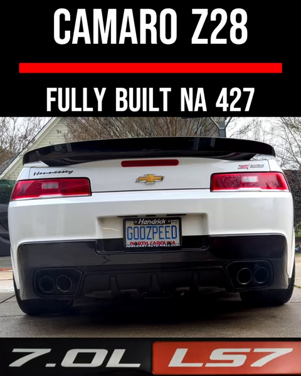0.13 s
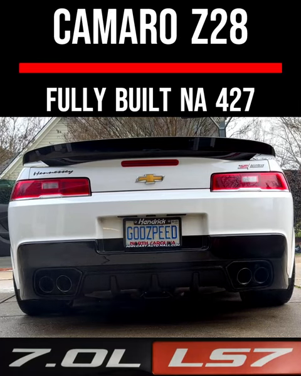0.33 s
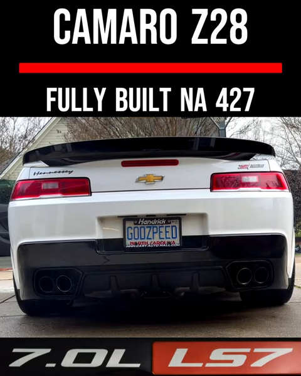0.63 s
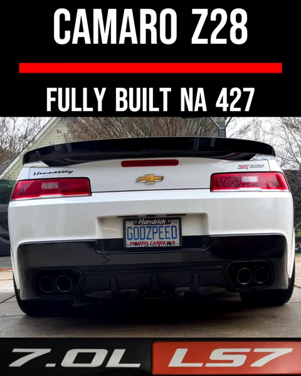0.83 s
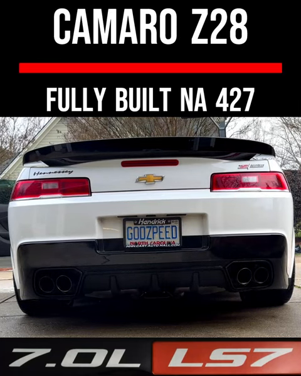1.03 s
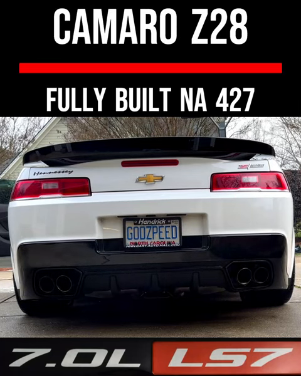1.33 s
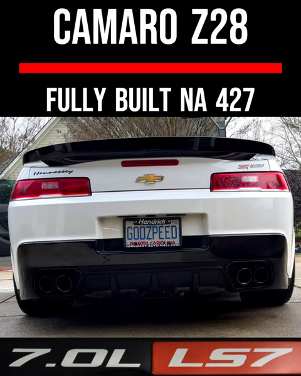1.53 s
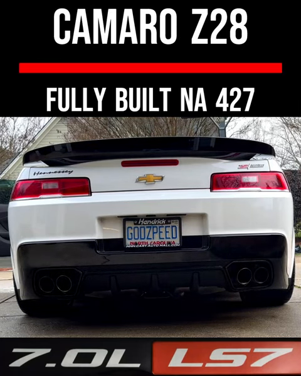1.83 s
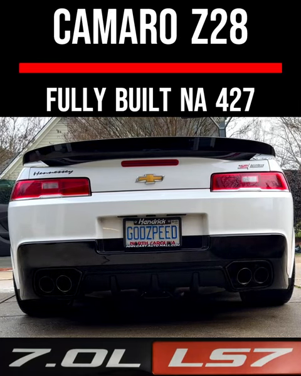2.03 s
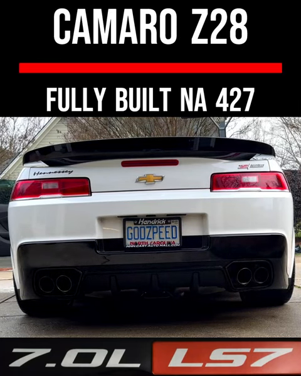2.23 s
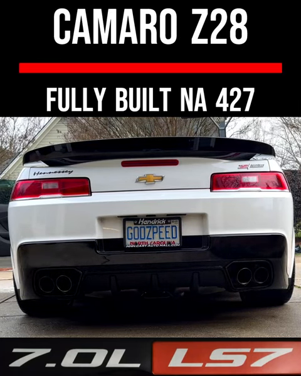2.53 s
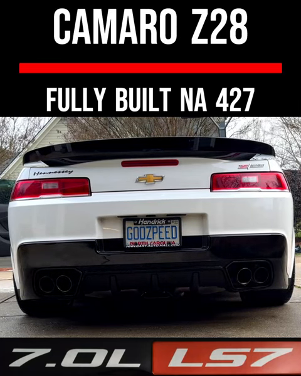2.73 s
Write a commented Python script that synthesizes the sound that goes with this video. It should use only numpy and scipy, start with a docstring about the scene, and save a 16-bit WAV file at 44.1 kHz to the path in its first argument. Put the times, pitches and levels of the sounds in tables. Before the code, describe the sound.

Powerful car exhaust heard from behind, barking and popping before dropping to an uneven, burbling idle

```python
"""Driveway, behind the car: a big cross-plane V8 settles from its fast starting idle into a loping one.
Each firing pops and barks through the exhaust and rasps as hiss at the tailpipes; the hardest ones crack.
As the speed falls the firings grow uneven, the pipes boom and a fine metallic ticking stands out.
Pulse trains on one engine speed drive falling tones, filter resonances and noise bursts; echoes follow."""
import sys
import numpy as np
from scipy import signal
from scipy.fft import rfft, irfft, next_fast_len
from scipy.io import wavfile
from scipy.ndimage import uniform_filter1d

SR = 44100
rng = np.random.default_rng(int(sys.argv[2]) if len(sys.argv) > 2 else 0)


def inscribe(sig):
    """Save sig as 16-bit PCM at rate SR to the path in sys.argv[1].

    A 1-D sig is mono; a 2-D sig holds one channel per row.
    Samples are clipped to [-1, 1] before scaling.
    """
    pcm = np.round(np.clip(np.atleast_2d(sig).T, -1, 1) * 32767)
    wavfile.write(sys.argv[1], SR, pcm.astype(np.int16))


N = 127008
T = np.arange(N) / SR

# engine speed: time_s, firings_per_s
ENGINE_SPEED = [(0.0, 116.65), (0.32, 116.02), (0.5, 118.2), (0.62, 117.0), (1.12, 103.85), (1.5, 100.94),
                (2.0, 99.28), (2.16, 93.46), (2.5, 93.18), (2.88, 93.54)]
# eight cylinders in firing order: pop_db, rasp_db, lateness_firing_intervals
CYLINDERS = [(-8, -2, .11), (0, 1, -.02), (-3, -1, .01), (-8, -3, .07), (-7, -1, .04), (1, 1, -.02),
             (1, 1, .02), (-8, -2, .07)]
# layer levels following engine load: time_s, firing_tone_db, pop_db, muffler_bark_db, rasp_db
LOAD = [(0, -18, -15, -24, -41.5), (.28, -18.5, -17, -26, -42), (.45, -20.5, -14, -27, -43.5),
        (.6, -22, -21.5, -25, -43.5), (.85, -19.5, -22, -25, -43.5), (.98, -22, -33.5, -27.5, -46),
        (1.45, -23.5, -28, -28.5, -46.5), (1.7, -27.5, -33, -30.5, -47), (2.0, -27.5, -35.5, -31.5, -45),
        (2.2, -28, -27.5, -33.5, -48), (2.6, -30.5, -33.5, -28.5, -45), (2.88, -24.5, -28, -34, -45.5)]
# unevenness of combustion: time_s, lope_share_0_to_1, pipe_boom_db
LOPE = [(0, 0.28, -35), (.2, 0.22, -28.5), (.5, 0.17, -30.5), (.6, 0.19, -22), (.85, 0.34, -27),
        (.93, 0.92, -27.5), (1.05, 0.73, -25.5), (1.35, 0.76, -30.5), (1.72, 0.84, -31.5),
        (1.95, 0.69, -28.5), (2.3, 1, -28.5), (2.6, 1, -30), (2.88, 0.54, -21)]
# hardest firings: pop_peak_s, pop_db
HARD_FIRINGS = [(.049, -13.5), (.059, -12.5), (.325, -13), (.334, -12), (.462, -13), (.529, -13.5),
                (.538, -16), (.555, -17.5), (.632, -14.5), (.701, -19.5), (.71, -16.5), (.852, -17),
                (.878, -19), (.924, -25), (.999, -27), (1.144, -29.5), (1.259, -26), (1.305, -23.5),
                (1.365, -24.5), (1.414, -23), (1.457, -22), (1.573, -23), (1.725, -27.5), (2.483, -24.5),
                (2.687, -26.5)]
# harmonics of the firing rate: multiple, level_db
TONE_HARMONICS = [(1, 0), (2, -3.5), (3, -17)]
# low pipe resonances: freq_hz, gain_db
BOOM_RESPONSE = [(20, -51), (33, -25), (45, -10), (58, 10), (78, -4), (100, 0), (135, -3.5), (175, 7),
                 (215, -0.5), (280, -10), (500, -56)]
# muffler resonances: freq_hz, gain_db
BARK_RESPONSE = [(60, -81.5), (120, -8), (170, 5.5), (215, -8), (280, 0), (320, 5), (385, -13), (445, 9.5),
                 (510, -3.5), (570, -16.5), (635, -11), (760, -15), (900, -52), (1300, -56), (3000, -57.5)]
# tailpipe hiss: freq_hz, gain_db
RASP_RESPONSE = [(400, -0.5), (1000, -5), (1550, 5.5), (1800, -12.5), (2050, -2), (2300, 10), (2480, -0.5),
                 (2750, 8.5), (3150, 6), (3600, -8), (4200, -12), (5400, -2.5), (7000, -14.5),
                 (10000, -12.5), (16000, -21)]
# metallic tick resonances: freq_hz, gain_db
TICK_RESPONSE = [(2000, -2.5), (4300, -38), (5000, 8), (5700, 7), (6700, -8), (7700, -1.5), (9000, 7),
                 (11000, 8.5), (13300, -3), (16000, -5)]
# low ring of a crack: freq_hz, gain_db
LOW_SNAP_RESPONSE = [(300, 8), (1000, -8), (1900, 5.5), (2400, 11), (3100, 13), (4200, 0.5), (7000, -4),
                     (15000, -27)]
# high ring of a crack: freq_hz, gain_db
HIGH_SNAP_RESPONSE = [(1000, -24), (3000, 20), (4200, -7), (5400, 13), (7000, -13), (9000, 8), (15000, -31)]
# engine-bay rush: freq_hz, gain_db
RUSH_RESPONSE = [(800, 0.5), (1550, 0), (2600, -6.5), (15000, -26)]
# stereo balance of the treble: freq_hz, left_over_right_db
TREBLE_BALANCE = [(1000, 2), (2300, -0.5), (3300, 6), (5500, 6.5), (7000, 10), (9000, -4.5), (15000, -4)]
# booming pipe swells: peak_s, pitch_hz, level_db
CHUGS = [(0.831, 178, -32), (1.228, 180, -31), (1.419, 181, -29), (1.581, 172, -30), (1.895, 170, -17.5),
         (2.049, 160, -20.5), (2.494, 188, -31), (2.802, 172, -33), (2.848, 169, -32)]
# tailpipe cracks: start_s, low_snap_db, high_snap_db
CRACKS = [(.0468, -36, -24.5), (.0558, -17, -16), (.1155, -21, -33), (.1245, -26, -33), (2.618, -30, -33),
          (.3225, -28, -18.5), (.3312, -20, -38), (.527, -39, -27), (.535, -21, -29), (.6288, -25, -29),
          (.8395, -28.5, -33), (.849, -22, -31.5), (.996, -34.5, -36), (1.304, -32, -37), (2.276, -30, -35)]
# base level of the faint ticking: time_s, level_db
TICKING_LEVEL = [(0, -51), (.9, -51), (1.5, -48), (2.05, -47.5), (2.15, -44.5), (2.25, -49), (2.88, -48)]
# clearest ticks: start_s, level_db
CLEAR_TICKS = [(0.959, -40), (1.266, -40), (1.603, -36), (1.821, -43), (2.085, -36), (2.254, -44.5),
               (2.427, -49), (2.685, -46), (2.738, -42)]
# brief dips of rasp and faint ticking: centre_s, gain_db
LULLS = [(1.592, -6), (1.75, -9.5), (1.911, -9), (2.067, -10), (2.84, -2)]
# echoes from paving, bumper and house: delay_s, louder_side_db, left_over_right_db
ECHOES = [(.0021, -50, -28), (.0047, -16.5, 52), (0.0122, -23, 16), (0.0174, -8, 13), (0.0305, -9, -34)]

FIRST_FIRING_INTERVALS = 0.5417
# at full lope: pop scatter, timing jitter, share of the cylinder pop pattern lost
SCATTER_DB, JITTER_S, PATTERN_FADE_SHARE = 2.5, 0.001, 0.92
RASP_SCATTER_DB = 3.0
# tone: lag; overtone loss and surge at full lope
TONE_LAG_INTERVALS, TONE_FADE_DB, SURGE_DB = 0.33, 7.5, 6.5
# pop: pitch at its peak, cycles to the peak, share the pitch finally sags, log pitch spread at full lope
POP_HZ, POP_CYCLES, POP_SAG_SHARE, POP_SPREAD = 432.5, 1.01, 0.27, 0.23
CHUG_CYCLES = 3
# bark: delay behind the pulse, turbulence decay, turbulence level at no lope, detuning share
BARK_LAG_S, PUFF_S, SMOOTH_CHURN, RING_SPREAD_SHARE = 0.00062, 0.0099, 0.05, 0.093
RASP_S, RASP_FLOOR, RASP_ALIKE_SHARE = 0.0045, 0.35, 0.23
CRACK_S, CRACK_TAIL_DB, CRACK_TAIL_S = 0.00063, -17.5, 0.01
TICK_S, TICK_FLOOR, TICK_ALIKE_SHARE, TICK_LEFT_DB = 0.0028, 0.2, 0.89, 4.5
TICK_LAG_INTERVALS, TICK_JITTER_S, TICK_SCATTER_DB, TICK_SPREAD_SHARE = 0.37, 0.0025, 5.0, 0.071
FLUTTER_DB, FLUTTER_PER_S, LULL_S = 5.5, 16, 0.018
RUSH_OVER_RASP_DB = -6
EXHAUST_LEFT_DB, LEFT_LAG_S = 0.7, 0.000023
ECHO_LOW_HZ, CEILING, CUTOFF_HZ = 386, 0.54, 15700


def from_db(db):
    """Decibels to gain."""
    return 10 ** (np.asarray(db) / 20)


def lean(left_db):
    """Left and right gains, left_db apart."""
    return from_db(left_db * np.array([[.5], [-.5]]))


def rms_one(x):
    """Scale to unit power."""
    return x / np.sqrt(np.mean(x ** 2) + 1e-20)


def in_time(rows):
    """Each column of a curve at every sample."""
    s, *columns = np.transpose(rows)
    return [np.interp(T, s, c) for c in columns]


def colour(x, points, balance=0):
    """Causal minimum-phase filter through (Hz, dB) points; balance leans the treble left or right."""
    size = 2 * next_fast_len(N)
    log_hz = np.log(np.maximum(np.arange(size // 2 + 1) * SR / size, 1))
    db = 0
    for weight, curve in ((1, points), (balance, TREBLE_BALANCE)):
        hz, gain_db = np.transpose(curve)
        db = db + weight * np.interp(log_hz, np.log(hz), gain_db)
    # fold the cepstrum onto positive time: minimum phase
    cepstrum = irfft(db * np.log(10) / 20)
    cepstrum[1:size // 2] *= 2
    cepstrum[size // 2 + 1:] = 0
    return irfft(rfft(x, size) * np.exp(rfft(cepstrum)))[:N]


def detuned(points, share, above_hz):
    """Shift the response points above a frequency by a share."""
    return [(hz * (1 + share * (hz > above_hz)), db) for hz, db in points]


def clicks(s, strength):
    """One impulse at each time."""
    return np.bincount(np.clip(s * SR, 0, N).astype(int), strength, N + 1)[:N]


def die_away(x, decay_s):
    """Give each impulse an exponential tail."""
    return signal.lfilter([1], [1, -np.exp(-1 / (decay_s * SR))], x + 1e-18)


def even(x):
    """Take out slow changes of level."""
    return x / np.sqrt(uniform_filter1d(x ** 2, size=7000) + 1e-12)


def hiss(envelope, points, alike):
    """Stereo noise under an envelope, ringing in a response; alike is the power share common to both sides."""
    shared, *own = rng.standard_normal((3, N))
    alike = np.clip(alike, 0, 1)
    noise = np.sqrt(alike) * shared + np.sqrt(1 - alike) * np.array(own)
    out = np.array([colour(n * envelope, points, side) for n, side in zip(noise, (.5, -.5))])
    return rms_one(out) * np.sqrt(np.mean(envelope ** 2))


def burst(s, hz, cycles, sag=0):
    """A tone that swells for some cycles, peaks at s and dies away, sagging in pitch."""
    out, rise_s = np.zeros(N), cycles / hz
    span = slice(*np.searchsorted(T, [s - rise_s, s + 5 * rise_s]))
    age = (T[span] - s) / rise_s
    swell = ((1 + age) * np.exp(-age)) ** 3
    turns = cycles * (age - sag * age ** 2 / (2 + abs(age)))
    out[span] = -swell * np.cos(2 * np.pi * turns)
    return out


def flutter():
    """A random treble gain with FLUTTER_PER_S new values a second, joined by straight lines in dB."""
    swing = 2 * rng.random(size=200) - 1
    return from_db(FLUTTER_DB * np.interp(T * FLUTTER_PER_S, np.arange(200), swing))


def lulls():
    """Gain with brief bell-shaped dips."""
    return from_db(sum(db * np.exp(-((T - at) / LULL_S) ** 2) for at, db in LULLS))


def firings(turn, lope, pop_db):
    """Time, pop dB and rasp strength of each firing: a cylinder pattern upset by lope and hard firings."""
    k = np.arange(int(turn[-1]))
    cylinder_db, rasp_db, late = np.array(CYLINDERS)[k % len(CYLINDERS)].T
    s = np.interp(k + FIRST_FIRING_INTERVALS + late, turn, T)
    uneven = np.interp(s, T, lope)
    strength, timing, grit = np.clip(rng.standard_normal((len(k), 3)), -1.5, 1.5).T
    db = np.interp(s, T, pop_db) + cylinder_db * (1 - PATTERN_FADE_SHARE * uneven)
    db += SCATTER_DB * uneven * strength
    for at, hard_db in HARD_FIRINGS:
        # the firing whose pop peaks nearest
        db[np.argmin(abs(s + POP_CYCLES / POP_HZ - at))] = hard_db
    rasp_db = rasp_db + RASP_SCATTER_DB * (uneven * strength + grit * .5)
    return s + JITTER_S * uneven * timing, db, from_db(rasp_db)


def rush(rasp_db):
    """Smooth noise from the engine bay, following the rasp level."""
    return hiss(from_db(rasp_db + RUSH_OVER_RASP_DB), RUSH_RESPONSE, alike=0.89)


def echoes(x):
    """A few early reflections, weak in the bass, leaning to either side."""
    bright = signal.sosfilt(signal.butter(2, ECHO_LOW_HZ, "high", fs=SR, output="sos"), x)
    out = 0
    for delay_s, db, left_db in ECHOES:
        delayed = np.interp(T - delay_s, T, bright, left=0)
        out = out + delayed * from_db(db - abs(left_db) / 2) * lean(left_db)
    return out


def ticking(turn, lull):
    """Faint metallic ticks in step with the firings plus clear ones, their top resonances at one of three pitches."""
    k = np.arange(int(turn[-1]))
    s = np.interp(k + FIRST_FIRING_INTERVALS + TICK_LAG_INTERVALS, turn, T)
    size, timing = rng.random((len(s), 2)).T
    s = s + TICK_JITTER_S * (2 * timing - 1)
    level = from_db(in_time(TICKING_LEVEL)[0]) * lull * flutter()
    excess_db = TICK_SCATTER_DB * np.minimum(-np.log(1 - size), 2.7)
    faint = np.interp(s, T, level) * from_db(excess_db)
    clear_s, clear_db = np.transpose(CLEAR_TICKS)
    s, strength = np.r_[s, clear_s], np.r_[faint, from_db(clear_db)]
    pitch = rng.integers(-1, 2, len(s))
    out = 0
    for step in (-1, 0, 1):
        tails = die_away(clicks(s, strength * (pitch == step)), TICK_S)
        points = detuned(TICK_RESPONSE, TICK_SPREAD_SHARE * step, above_hz=8000)
        out = out + hiss(tails + TICK_FLOOR * level, points, TICK_ALIKE_SHARE)
    return out * lean(TICK_LEFT_DB)


def cracks():
    """The steepest pulses snap, each with its own mix of low and high ring, and leave a short tail."""
    s, low_db, high_db = np.transpose(CRACKS)
    out = 0
    for db, points in ((low_db, LOW_SNAP_RESPONSE), (high_db, HIGH_SNAP_RESPONSE)):
        hits = clicks(s, from_db(db))
        tail = from_db(CRACK_TAIL_DB) * die_away(hits, CRACK_TAIL_S)
        out = out + hiss(die_away(hits, CRACK_S) + tail, points, alike=0.46)
    return out


def rasp(s, strength):
    """Every pulse leaves the tailpipes with a short burst of hiss over a steady floor."""
    puffs = die_away(clicks(s, strength), RASP_S)
    return hiss(rms_one(puffs + RASP_FLOOR), RASP_RESPONSE, RASP_ALIKE_SHARE)


def chugs():
    """Low swells, when a full charge sets a pipe booming."""
    return sum(from_db(db) * burst(s, hz, CHUG_CYCLES) for s, hz, db in CHUGS)


def boom(s):
    """Firings fuller or leaner than average set the low pipe resonances going."""
    return even(colour(clicks(s, rng.uniform(-0.75, 1, len(s))), BOOM_RESPONSE))


def bark(s, strength, lope):
    """Steep pulse fronts and the turbulence behind them ring through the mufflers, some sharp, some flat."""
    shift = np.clip(np.interp(s, T, lope) * 2 * (2 * rng.random(len(s)) - 1), -1, 1)
    fronts = clicks(s, strength)
    fronts_rms = np.sqrt(np.mean(fronts ** 2))
    churn = rms_one(die_away(fronts, PUFF_S) * rng.standard_normal(N))
    out = colour((lope + SMOOTH_CHURN) * churn, BARK_RESPONSE)
    for step in (-1, 0, 1):
        # crossfade each front between neighbouring tunings
        share = np.maximum(1 - abs(shift - step), 0)
        points = detuned(BARK_RESPONSE, RING_SPREAD_SHARE * step, above_hz=350)
        out += colour(clicks(s, strength * share) / fronts_rms, points)
    return even(out)


def firing_tone(turn, lope):
    """Pulsing of the gas flow; as firings turn uneven it surges and its overtones fade."""
    every_other = np.arange(0, turn[-1] + 2, 2)
    surge = np.interp(turn, every_other, 2 * rng.random(len(every_other)) - 1)
    phase = 2 * np.pi * (turn - FIRST_FIRING_INTERVALS - TONE_LAG_INTERVALS)
    wave = 0
    for multiple, db in TONE_HARMONICS:
        fade_db = TONE_FADE_DB * lope * (multiple > 1)
        wave = wave + from_db(db - fade_db) * np.cos(multiple * phase)
    return wave * from_db(SURGE_DB * lope * surge)


def pops(s, db, lope):
    """Each firing leaves the pipes as a short falling pop; uneven ones are pitched higher or lower."""
    hz = POP_HZ * np.exp(POP_SPREAD * np.interp(s, T, lope) * (2 * rng.random(len(s)) - 1))
    peak_s = s + POP_CYCLES / POP_HZ
    return sum(gain * burst(at, f, POP_CYCLES, POP_SAG_SHARE) for at, f, gain in zip(peak_s, hz, from_db(db)))


def scene():
    """Engine layers on one speed and lope; exhaust slightly left, echoes and treble around it."""
    turn = np.cumsum(in_time(ENGINE_SPEED)[0]) / SR  # firings elapsed
    tone_db, pop_db, bark_db, rasp_db = in_time(LOAD)
    lope, boom_db = in_time(LOPE)
    s, firing_db, rasp_strength = firings(turn, lope, pop_db)

    front_strength = from_db(firing_db - np.interp(s, T, pop_db))
    pipes = from_db(bark_db) * bark(s + BARK_LAG_S, front_strength, lope)
    pipes = pipes + from_db(tone_db) * firing_tone(turn, lope)
    pipes = pipes + pops(s, firing_db, lope)
    pipes = pipes + from_db(boom_db) * boom(s) + chugs()
    direct = np.array([np.interp(T - LEFT_LAG_S, T, pipes), pipes]) * lean(EXHAUST_LEFT_DB)

    lull = lulls()
    treble = rush(rasp_db)
    treble = treble + from_db(rasp_db) * rasp(s, rasp_strength) * flutter() * lull
    treble = treble + cracks() + ticking(turn, lull)
    return direct + echoes(pipes) + treble


def record(dry):
    """Round the highest peaks, cut the top steeply."""
    rounded = dry / (1 + (dry / CEILING) ** 4) ** (1 / 4)
    return signal.sosfilt(signal.ellip(10, .1, 80, CUTOFF_HZ, fs=SR, output="sos"), rounded)


dry = scene()
out = record(dry)
inscribe(out)
```